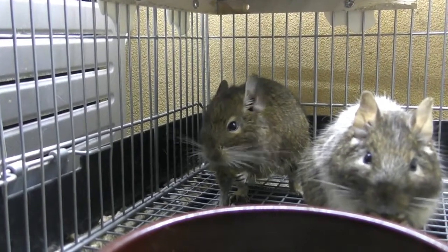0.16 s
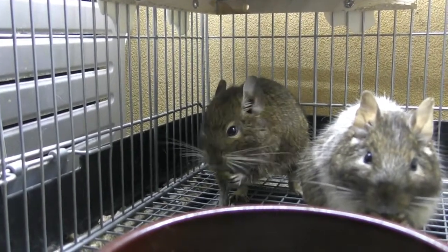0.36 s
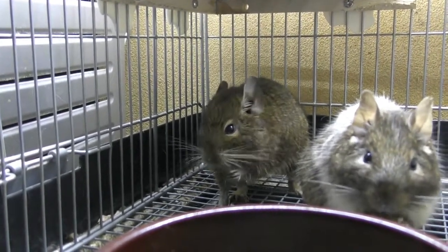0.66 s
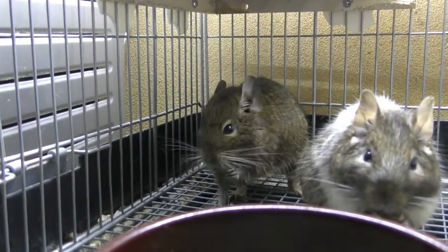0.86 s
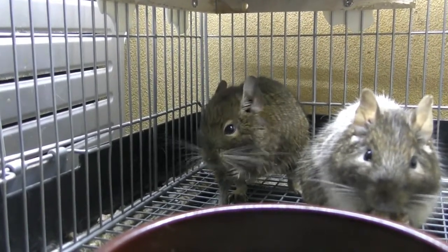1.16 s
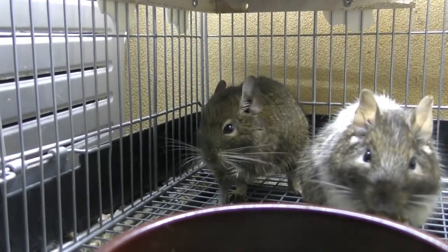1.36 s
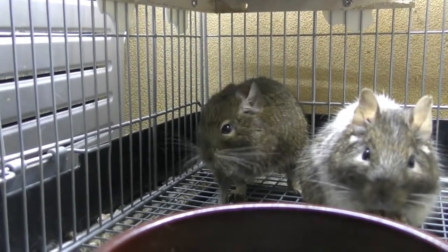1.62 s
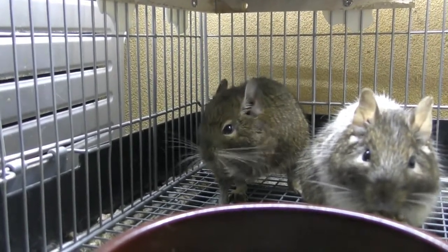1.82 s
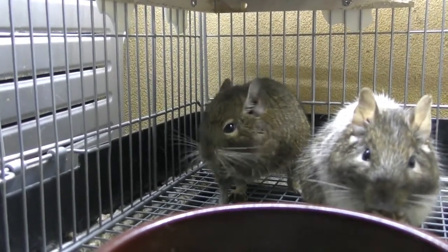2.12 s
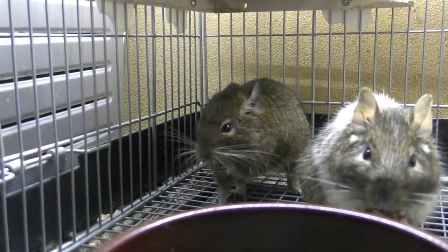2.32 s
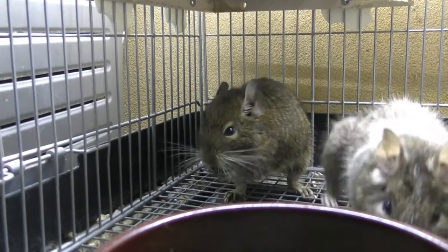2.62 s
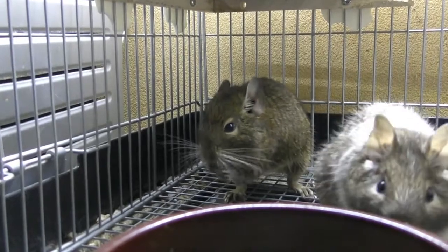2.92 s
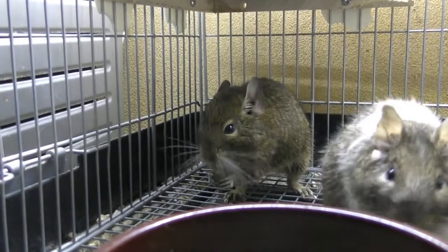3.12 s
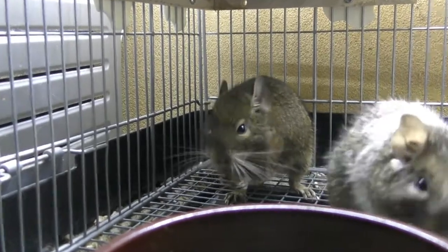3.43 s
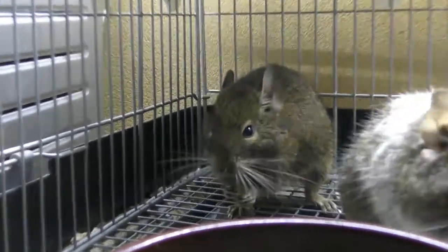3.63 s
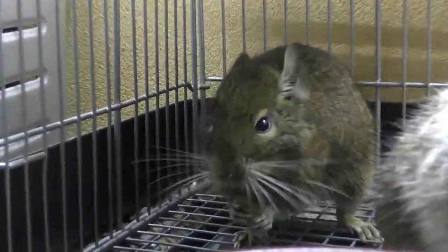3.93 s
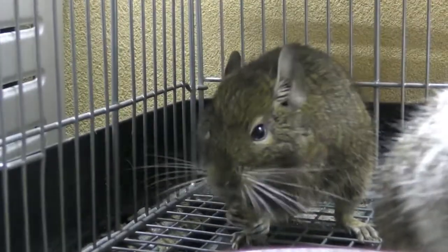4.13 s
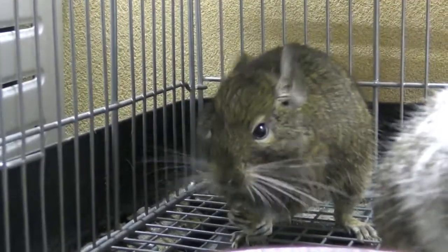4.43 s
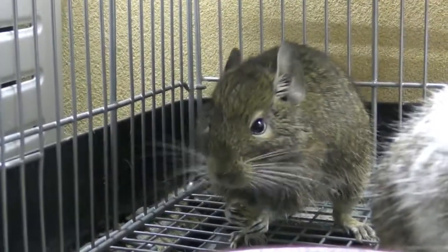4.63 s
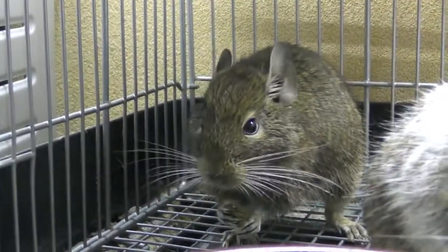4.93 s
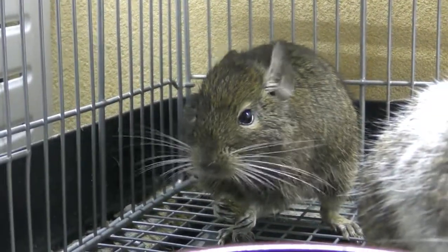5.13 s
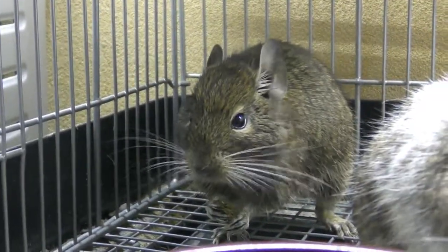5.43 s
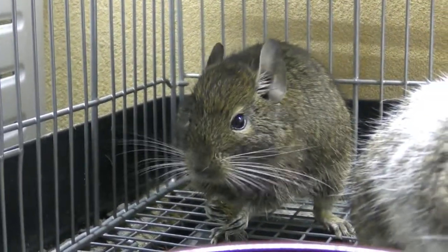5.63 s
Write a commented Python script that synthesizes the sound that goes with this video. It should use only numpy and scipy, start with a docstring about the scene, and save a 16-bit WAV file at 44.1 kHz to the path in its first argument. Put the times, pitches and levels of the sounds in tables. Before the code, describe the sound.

Short, sharp, raspy whistling squeaks from a caged rodent, over light metallic ticks, a softly turning wheel and room hush.

```python
"""First comes a shrill alarm squeak from a degu, a small rodent, while its wire cage shudders.
More squeaks follow: most start as a rasp of fluttering vocal folds and clear into a whistle.
From about one second on, something, likely a running wheel, scuffs five times a second,
and claws tick on the wire mesh. The room adds a low hush.
The gain control of a nearby camera turns the background down under the squeaks."""
import sys
import numpy as np
from scipy import signal
from scipy.fft import rfft, irfft, next_fast_len
from scipy.io import wavfile
from scipy.ndimage import map_coordinates

SR = 44100
rng = np.random.default_rng(int(sys.argv[2]) if len(sys.argv) > 2 else 0)


def master_out(mix):
    """Clip the mix to full scale and print it as 16-bit PCM to the path in sys.argv[1]."""
    frames = np.transpose(np.atleast_2d(mix))
    ceiling = np.clip(frames, -1, 1)
    pcm = np.round(ceiling * 32767).astype(np.int16)
    wavfile.write(sys.argv[1], SR, pcm)


N = 254016

# One squeak a row: t/s, length/s, level/dB, opening snap/dB, start f/Hz, top f/Hz, climb/s,
# bend after/s, bend/Hz, end flick/Hz, rasp/0-1, clears after/s, period doubling/0-1,
# mouth gain at 4 kHz/dB, mouth gain at 12 kHz/dB
SQUEAKS = [ (.009, 0.052, -11.5, -2, 3375, 4153, .025, .034, -110, 279, 0.84, 0.03, 0.26, -4.5, -5),
           (0.555, 0.013, -6, -4.5, 4070, 4130, 0.0053, .03, -120, 7, 0.17, .009, 0.38, -9, -10),
           (0.594, 0.0034, -36.5, 6, 4150, 4190, .004, .004, -3, 0, .05, .005, 0, 6, 1),
           (0.997, 0.024, -11, -2.5, 2490, 3915, .021, .02, -6, -2, 0.96, 0.034, 0.86, -4.5, -3),
           (1.069, .005, -25, 0, 4050, 4090, .004, .004, 0, 0, .05, .005, 0, 1, -7),
           (1.628, 0.07, -9, 2, 1940, 3722, 0.0158, 0.035, -360, 189, 1, 0.022, 0.26, -2.5, -2.5),
           (1.994, 0.064, -6.5, -12.5, 2875, 3860, 0.023, 0.045, -200, 277, 0.9, .016, 0.33, -1.5, -1.5),
           (2.359, 0.05, -11.5, 1.5, 3630, 3836, 0.018, .036, 72, 220, 0.2, 0.022, 0.25, 0.5, -2),
           (2.791, .064, -10, -3, 2200, 3870, .027, .042, 0, 320, .5, .021, .15, -1, -2.5),
           (3.359, 0.055, -8, -16, 3350, 4136, .021, .033, -52, 162, 0.68, 0.03, 0.5, -2, -0.5),
           (3.892, 0.057, -9.5, -9.5, 3603, 4280, 0.044, .045, -100, 198, 0.45, 0.046, 0.47, 0.5, 2.5),
           (4.485, 0.056, -10.5, -8, 3240, 4040, 0.045, .044, 87, 289, 0.55, 0.032, 0.23, 0, 0),
           (5.106, 0.06, -11, -8, 3080, 3890, 0.039, 0.052, 46, 464, .48, 0.038, 0.27, 0, 1.5), ]
# How the throat and mouth colour the voice: f/Hz, level/dB
THROAT = [(900, -30), (1900, -11.5), (3000, -13), (4000, -6), (4800, -12.5), (5600, 2), (6300, -3),
          (7200, -0.5), (8200, -2.5), (9400, -2.5), (11000, 4.5), (12500, 0), (14500, 0.5), (16000, -20.5)]
# How far a squeak at the left microphone leads the right: f/Hz, phase/rad
LEFT_LEAD = [(1200, -.3), (2500, -0.076), (4000, 0.67), (6000, 0.49), (9800, -0.0038), (11000, 0.078),
             (11500, 1), (12500, 0.094), (14000, -1.3), (16000, -.5)]
# Claws hitting the mesh: t/s, level/dB, treble/dB
CLAW_TICKS = [(1.497, -28, 16.5), (1.5374, -18.5, 9), (1.5463, -15, 7), (2.2844, -24.5, 7),
              (2.3128, -15.5, 13.5), (3.67, -38, 7), (3.7528, -27.5, 14), (3.7827, -24.5, 16),
              (4.7435, -30.5, 13), (4.9575, -20.5, 9), (4.9706, -14, 10), (4.9794, -14, 10),
              (5.576, -30, 10)]
# The notes the wire floor rings at: f/Hz, width/Hz, level/dB
MESH_NOTES = [(1970, 140, -10.5), (2850, 180, 2.5), (4280, 450, -9), (5300, 720, -1.5), (7900, 4500, -14),
              (9450, 1300, -3.5), (13100, 1700, -21)]
# Jolts that shake the cage: t/s, level/dB
JOLTS = [(0, -33.5), (.035, -37), (0.073, -36), (0.113, -36.5), (0.334, -42), (0.407, -36), (0.474, -33.5),
         (0.547, -32.5), (.6, -42.5), (0.677, -40)]
# The rumble of the cage's tray: f/Hz, level/dB
TRAY_RUMBLE = [(30, -33), (55, -24), (75, 1), (110, -11.5), (160, 4), (220, -5.5), (300, 2), (460, -0.5),
               (560, -26), (850, -15), (1300, -17.5), (2000, -20), (3500, -46), (12000, -59)]
# The notes the bars ring at: f/Hz, level/dB
BAR_NOTES = [(389, 5), (855, -4), (1567, 2), (1900, -5.5), (2420, -6), (3035, -9), (4300, -10)]
# How fast the wheel is pushed: t/s, strokes per second/Hz
WHEEL_PACE = [(.97, 5.1), (1.7, 5.05), (2.3, 4.7), (2.9, 5.1), (3.3, 5.2), (4.2, 5.35), (5.76, 5.3)]
# How hard it is pushed: t/s, level/dB
WHEEL_PUSH = [(.97, -48), (1.17, -42), (1.5, -45), (2.65, -40), (3.4, -45), (4.1, -41), (4.8, -41),
              (5.3, -47), (5.76, -41)]
# The tone of its scrape: f/Hz, level/dB
SCRAPE_TONE = [(400, -5.5), (900, -5), (1250, 2.5), (2000, -5), (3200, -5), (4400, -0.5), (6200, -16),
               (9000, -13), (12500, -16.5), (16000, -18.5)]
# The notes it drones at: f/Hz, width/Hz, level/dB
WHEEL_NOTES = [(716, 28.7, -0.5), (1170, 68, 3), (1440, 85, -5), (1810, 120, -12)]
# How loud that drone is: t/s, level/dB
DRONE_LEVEL = [(0, -56.5), (.9, -56.5), (1.15, -49.5), (2.6, -51), (4.2, -51), (5.76, -51)]
# The hush of the room: f/Hz, level/dB
ROOM_TONE = [(35, -7), (42, 1.5), (55, -9.5), (120, 2), (220, 0), (340, 1), (490, -4), (610, -13.5),
             (1000, -12.5), (2000, -12), (3200, -18.5), (6000, -28.5), (12000, -30), (16000, -29)]
# How alike noise is on the left and right: f/Hz, likeness/0-1
STEREO_LIKENESS = [(40, 0.86), (300, .96), (1100, 0.8), (2500, 0.63), (12000, 0.86)]

ATTACK_S, SNAP_S, DROOP_DB, RELEASE_DB_PER_S = 0.0038, 0.021, 1.5, 1400  # a squeak's loudness
BEND_S, FLICK_S, FALL_HZ, FALL_S = .008, 0.0069, 343, 0.0131  # a squeak's pitch
WHISTLE_RASP, END_RASP = .025, 0.18  # roughness that stays in the whistle; extra as the voice lets go


def degu(doubling_lasts=1.4, rasp_db=4.5):
    """Squeaks start rough and clear as the effort droops; throat and mouth shape them, the cage echoes."""
    track, t = np.zeros((2, N)), np.arange(SR // 8) / SR
    hz = np.fft.rfftfreq(len(t), 1 / SR)
    for s, length, level_db, snap_db, *melody, rasp, clears, doubling, low_db, high_db in SQUEAKS:
        db = level_db - DROOP_DB * np.minimum(t / length, 1) ** 2
        db -= RELEASE_DB_PER_S * np.maximum(t - length, 0)
        db += snap_db * np.exp(-(t / SNAP_S) ** 2)
        rough = WHISTLE_RASP + rasp * (1 - step(t / clears - .5))
        rough += END_RASP * step((t - length) / FLICK_S + 1)
        doubled = doubling * (1 - step(t / (clears * doubling_lasts) - .5))
        pitch = squeak_pitch(t, length, *melody)
        voice = vocal_folds(t, pitch, db + rasp_db * (rough - .5), rough, doubled)
        mouth = amp(np.interp(hz, [4000, 8000, 12000], [low_db, 0, high_db]))
        voice = irfft(rfft(voice) * mouth, len(voice))
        add(track, s, cage_echo(voice, near_db=-4, near_t60=0.034, far_db=-24, far_t60=0.12,
                                spread=0.45, dull_hz=9000))
    microphones = lambda f: np.exp(.5j * np.outer([1, -1], at_hz(LEFT_LEAD, f)))
    return filtered(track, lambda f: colour(THROAT)(f) * microphones(f)) * amp([[.6], [-.6]])


def vocal_folds(t, pitch, db, rasp, doubling, jitter=0.07, hiss=0.25, flutter_hz=720, drift_db=3.0):
    """Uneven cycles make a rasp, even ones a whistle; period doubling adds tones between the overtones."""
    rasp, doubling = np.clip(rasp, 0, 1), np.clip(doubling, 0, 1)
    fast_waver = jitter * rasp * wobble(3000, len(t))
    slow_waver = (0.0017 + 0.014 * rasp) * wobble(190.5, len(t))
    phase = 2 * np.pi * np.cumsum(pitch * (1 + fast_waver + slow_waver)) / SR
    voice = hiss * rasp ** 2 * rng.standard_normal(len(t))
    for k in np.arange(1, 15) / 2:  # whole and half multiples of the pitch
        share = 1 if k % 1 == 0 else doubling * min(k / 2.18, 1) ** 2
        weak_db = 0.91 * max(k - 2, 0) * np.minimum(db + 17, 0)  # less effort, fewer overtones
        gain = share * amp(weak_db + drift_db * wobble(102.4, len(t))) * (k * pitch < SR * .42)
        voice += gain * np.sin(k * phase + rng.uniform(0, 2 * np.pi))
    # a slower, unsteady vibration chops the rasp into pulses
    chop_hz = flutter_hz * (1 + 0.22 * wobble(423, len(t)))
    flutter = np.exp(0.32 * rasp * np.sin(2 * np.pi * np.cumsum(chop_hz) / SR))
    return amp(db) * voice * flutter * step(t / ATTACK_S) ** 2


def squeak_pitch(t, length, start_hz, top_hz, climb_s, bend_at, bend_hz, flick_hz):
    """The pitch climbs, levels off, bends a little, flicks at the end and falls away."""
    climb = start_hz + (top_hz - start_hz) * step(t / climb_s)
    bend = bend_hz * step((t - bend_at) / BEND_S + .5)
    flick = flick_hz * step((t - length) / FLICK_S + 1)
    return climb + bend + flick - FALL_HZ * step((t - length) / FALL_S)


def cage_echo(x, near_db, near_t60, far_db, far_t60, spread, dull_hz):
    """Adds quick echoes off the cage and duller ones off the room. A t60 is the seconds to fade 60 dB."""
    t = np.arange(SR // 4) / SR
    mid, side = rng.standard_normal((2, len(t)))
    pair = np.array([mid + spread * side, mid - spread * side])
    tail = lambda t60: unit(pair * amp(-60 * t / t60) * (t > .0005)) / np.sqrt(len(t))
    soften = signal.butter(2, dull_hz, fs=SR)
    echo = amp(near_db) * tail(near_t60) + amp(far_db) * signal.lfilter(*soften, tail(far_t60))
    echo[:, 0] = 1  # the direct sound
    return signal.fftconvolve(x[None], echo, axes=1)


def claws(ring_t60=0.044, snap_db=6, snap_t60=0.0042):
    """Each claw makes a brief crack and a short ring of the wire floor."""
    t = np.arange(SR // 10) / SR
    ring, crack = np.zeros((2, 2, N))
    fade = amp(-60 * t / ring_t60) + amp(snap_db - 60 * t / snap_t60)
    for s, db, treble_db in CLAW_TICKS:
        burst = amp(db - 5) * fade * rng.standard_normal(len(t))
        burst = cage_echo(burst, near_db=-5, near_t60=0.048, far_db=-17, far_t60=0.25,
                          spread=0.55, dull_hz=10400)
        add(ring, s, burst)
        add(crack, s, amp(treble_db - 7) * burst)
    crack_tone = colour([(500, -32), (2000, -13.5), (5000, -15), (9000, -19), (16000, -19)])
    return filtered(ring, resonances(MESH_NOTES)) + filtered(crack, crack_tone)


def cage_shudder(t, rise_s=0.0059, shake_t60=0.37, knock_t60=0.028, sway_db=3, wander_hz=7):
    """Each jolt knocks the cage: its tray rumbles and its bars ring along, then they die away."""
    def jolts(t60):
        each = (amp(db - 60 * np.abs(t - s) / t60) * step((t - s) / rise_s) for s, db in JOLTS)
        return np.sqrt(sum(jolt ** 2 for jolt in each))
    shake, knocks = jolts(shake_t60), amp(3) * jolts(knock_t60)
    # soft contacts: only the low thud gets through
    low_band = signal.butter(3, [50, 450], "bandpass", fs=SR, output="sos")
    thuds = signal.sosfilt(low_band, knocks * noise(colour(TRAY_RUMBLE)))
    bars = 0
    for hz, db in BAR_NOTES:
        phase = 2 * np.pi * np.cumsum(hz + wander_hz * wobble(73.3, N)) / SR
        bars += amp(db + sway_db * wobble(21, N)) * np.sin(phase)
    rumble = amp(2.5) * shake * noise(colour(TRAY_RUMBLE))
    return rumble + thuds + amp(-8) * shake * unit(bars)


def running_wheel(t, rise_s=0.019, fall_s=0.034, grain_db=3, swell_db=3, uneven_db=1.3):
    """The rolling wheel drones; each stroke scrapes, rattles and makes the drone swell."""
    count = np.cumsum(at_time(WHEEL_PACE, t) * (t >= WHEEL_PACE[0][0])) / SR
    times = t[np.searchsorted(count, np.arange(count[-1]), side="right")]
    levels = at_time(WHEEL_PUSH, times) + uneven_db * rng.standard_normal(len(times))
    strokes = sum(amp(db) * np.exp(-((t - s) / np.where(t < s, rise_s, fall_s)) ** 2 / 2)
                  for s, db in zip(times, levels))
    scrape = amp(-2.5) * strokes * amp(grain_db * wobble(260, N)) * noise(colour(SCRAPE_TONE))
    drone_db = at_time(DRONE_LEVEL, t) - 2 + swell_db * strokes / strokes.max()
    drone = amp(drone_db) * noise(resonances(WHEEL_NOTES))
    rattle = (amp(-14) * strokes + amp(-61.5)) * grit()
    return (scrape + drone) * amp([[-1], [1]]) + rattle  # the wheel is a little to the right


def grit(per_s=55, spread_db=11, t60=0.066):
    """Tiny clicks of random size at random moments."""
    hits = (rng.random(N) < per_s / SR) * amp(spread_db * np.clip(rng.standard_normal(N), -2, 2))
    fades = signal.fftconvolve(hits, amp(-60 * np.arange(SR // 20) / SR / t60))[:N]
    return unit(fades * noise(colour([(800, -19), (3000, 10), (12000, 4), (16000, -24.5)])))


def room_hush():
    """The steady, low noise of the room."""
    return amp(-48) * noise(colour(ROOM_TONE))


def noise(response):
    """Stereo noise of average strength 1, shaped by a filter."""
    turn = lambda f: np.arccos(np.clip(at_hz(STEREO_LIKENESS, f), -1, 1)) / 2
    shares = lambda f: np.array([np.cos(turn(f)), np.sin(turn(f))])
    mid, side = filtered(rng.standard_normal((2, N)), lambda f: response(f) * shares(f))
    return unit(np.array([mid + side, mid - side]))


def filtered(x, response):
    """Scales each frequency f in x by response(f)."""
    size = next_fast_len(N + SR // 2)
    return irfft(rfft(x, size) * response(np.fft.rfftfreq(size, 1 / SR)), size)[..., :N]


def colour(points):
    """A filter drawn through points of f/Hz, level/dB."""
    return lambda f: amp(at_hz(points, f))


def resonances(notes):
    """A filter that rings at notes of f/Hz, width/Hz, level/dB."""
    return lambda f: sum((-1) ** k * amp(db) * 1j * f * width / (hz * hz - f * f + 1j * f * width)
                         for k, (hz, width, db) in enumerate(notes))


def at_hz(points, hz):
    """Reads a table between its frequencies, on a log scale."""
    f, values = np.transpose(points)
    return np.interp(np.log(hz + 1), np.log(f + 1), values)


def at_time(points, t):
    """Reads a table between its times."""
    return np.interp(t, *np.transpose(points))


def wobble(rate, size):
    """A smooth curve through `rate` random points a second."""
    points = rng.standard_normal(int(size * rate / SR) + 4)
    return map_coordinates(points, [np.arange(size) * rate / SR])


def step(u):
    """A smooth rise from 0 to 1 as u goes from 0 to 1."""
    return np.sin(np.pi / 2 * np.clip(u, 0, 1)) ** 2


def amp(db):
    """Turns decibels into a gain."""
    return 10 ** (np.asarray(db) / 20)


def unit(x):
    """Scales x to an average strength (rms) of 1."""
    return x / np.sqrt(np.mean(x ** 2) + 1e-20)


def add(track, s, sound):
    """Mixes a sound in at s seconds."""
    part = track[..., max(round(s * SR), 0):][..., :sound.shape[-1]]
    part += sound[..., :part.shape[-1]]


def scene():
    """The degu and the noises of its cage, over the hush of the room."""
    t = np.arange(N) / SR
    hush = room_hush()
    return degu() + claws() + running_wheel(t) + cage_shudder(t) + hush


def record(dry, limit_db=-19, release_db_per_s=170, detect_s=0.00049, attack_s=0.00056,
           ahead_s=0.00058, firmness=.9, low_cut_hz=38, top_hz=16100):
    """Gain control turns loud moments down fast and recovers steadily; deep bass and top treble are cut."""
    t = np.arange(N) / SR
    smooth = lambda v, s: signal.lfilter([1 - np.exp(-1 / (s * SR))], [1, -np.exp(-1 / (s * SR))], v)
    power = smooth(np.mean(dry ** 2, axis=0), detect_s)
    over_db = np.maximum(10 * np.log10(power + 1e-12) - limit_db, 0)
    ramp = release_db_per_s * t
    held_db = np.maximum.accumulate(over_db + ramp) - ramp  # jumps up at a peak, then slides back
    cut_db = firmness * np.interp(t + ahead_s, t, smooth(held_db, attack_s))
    low_cut = signal.butter(2, low_cut_hz, "highpass", fs=SR, output="sos")
    out = signal.sosfilt(low_cut, dry * amp(-cut_db))
    return filtered(out, lambda f: 1 / (1 + (f / top_hz) ** 100))


dry = scene()
out = record(dry)
master_out(out)
```